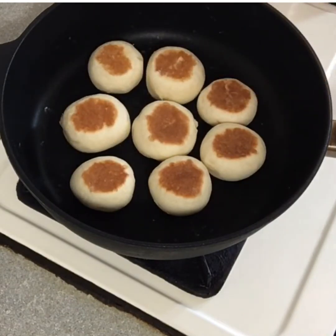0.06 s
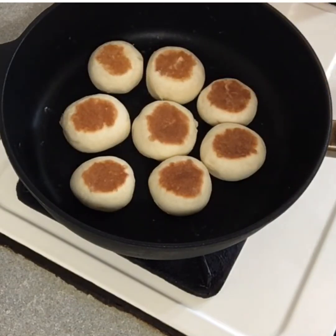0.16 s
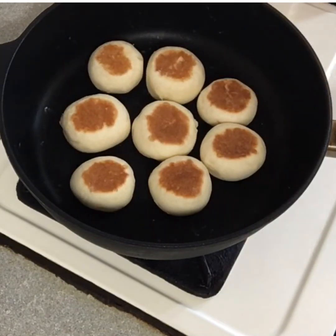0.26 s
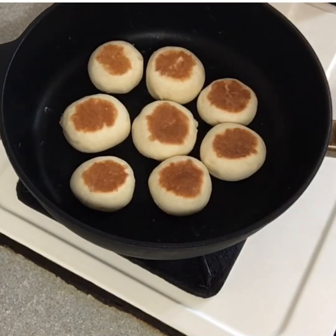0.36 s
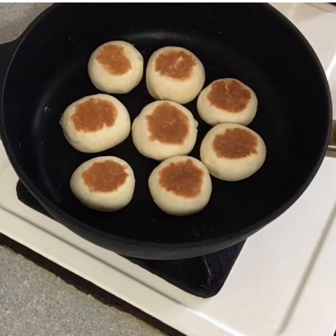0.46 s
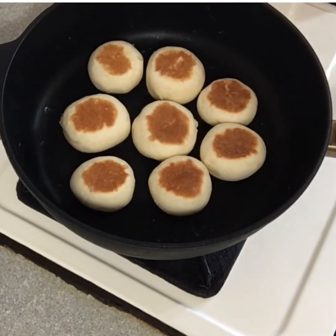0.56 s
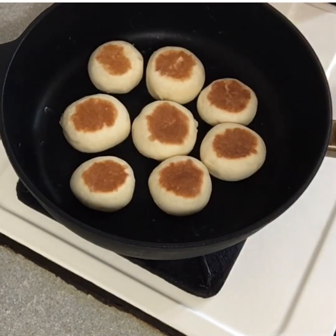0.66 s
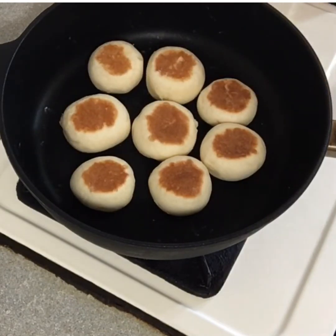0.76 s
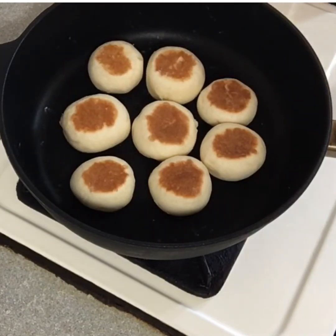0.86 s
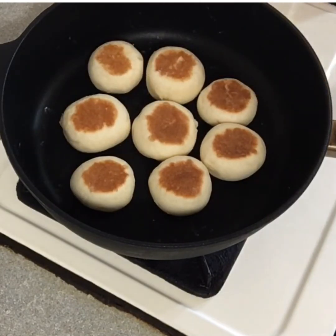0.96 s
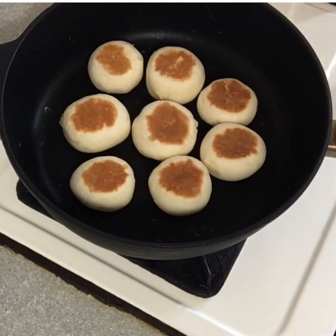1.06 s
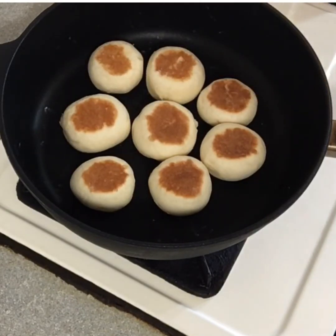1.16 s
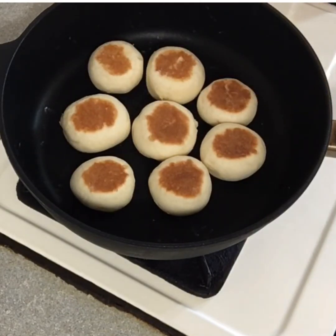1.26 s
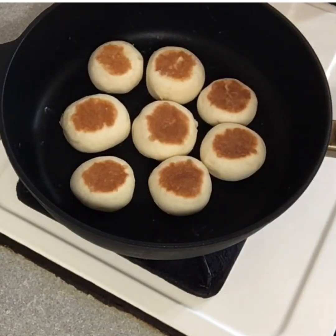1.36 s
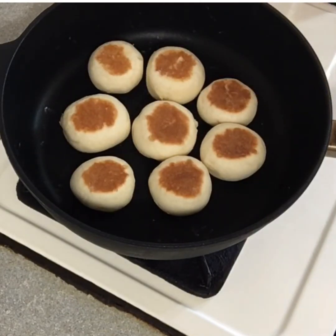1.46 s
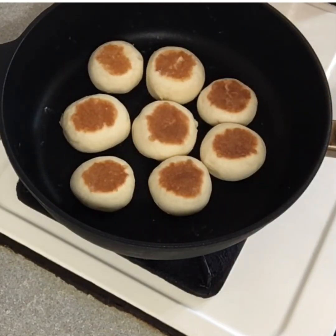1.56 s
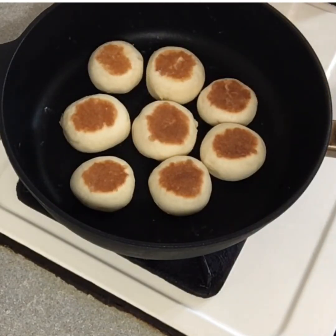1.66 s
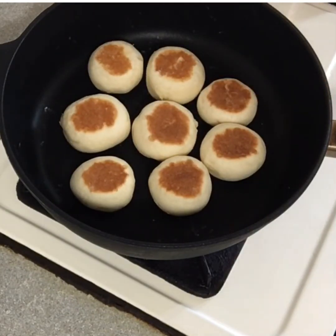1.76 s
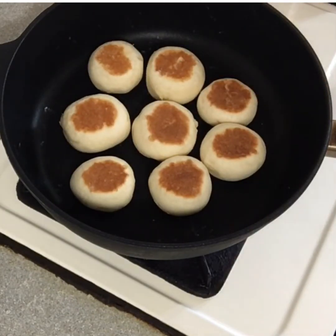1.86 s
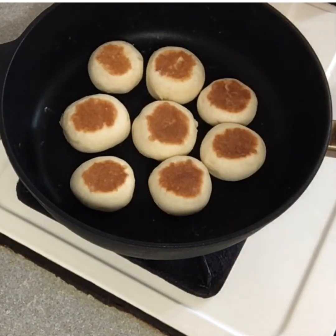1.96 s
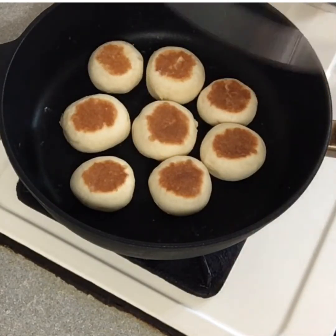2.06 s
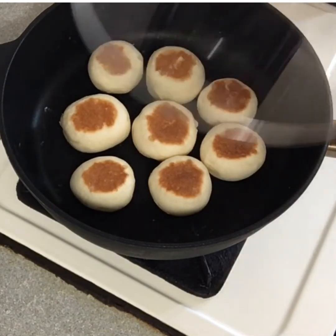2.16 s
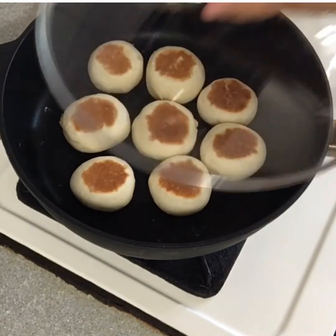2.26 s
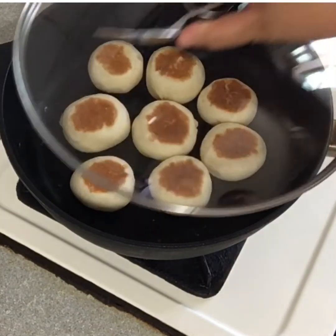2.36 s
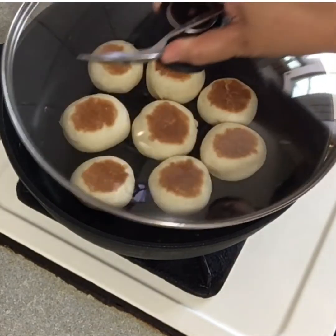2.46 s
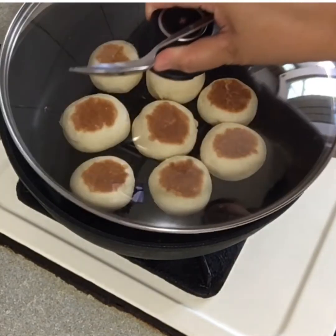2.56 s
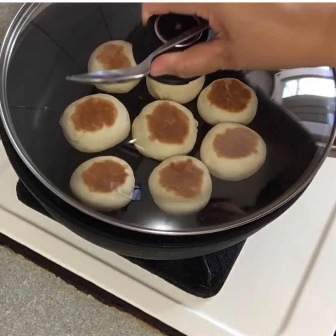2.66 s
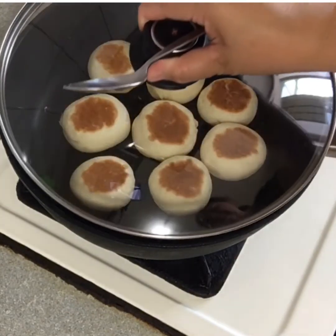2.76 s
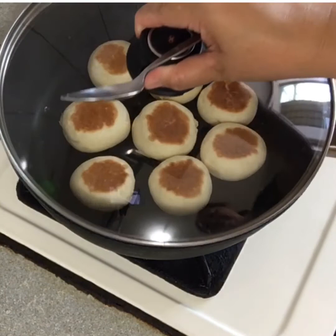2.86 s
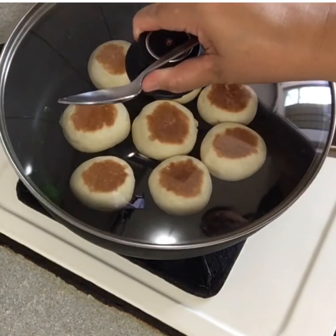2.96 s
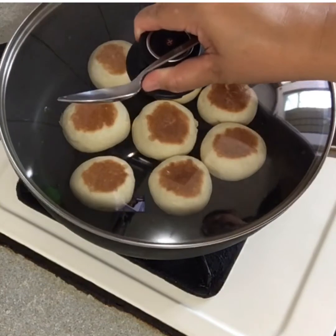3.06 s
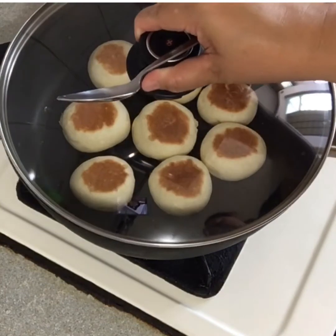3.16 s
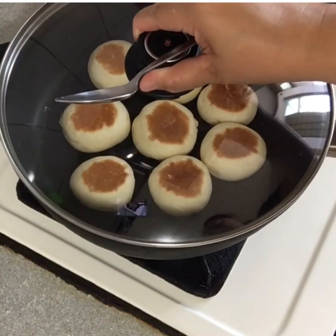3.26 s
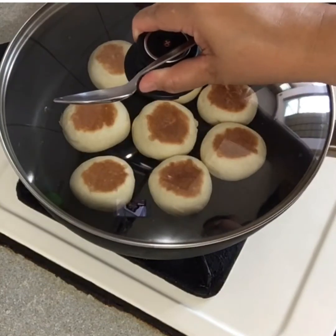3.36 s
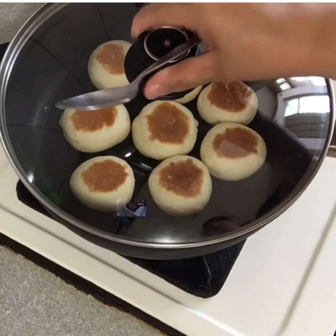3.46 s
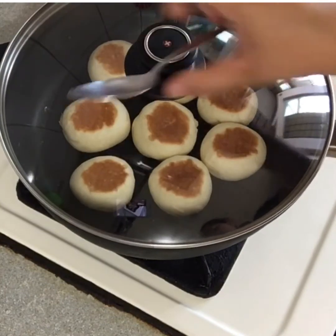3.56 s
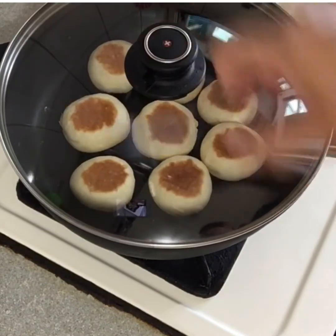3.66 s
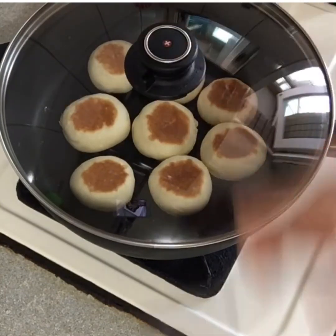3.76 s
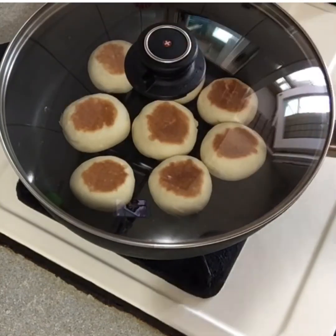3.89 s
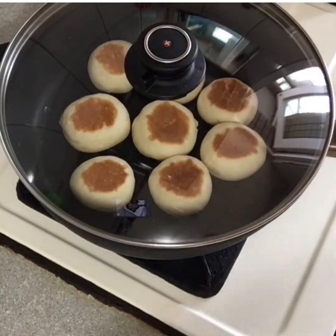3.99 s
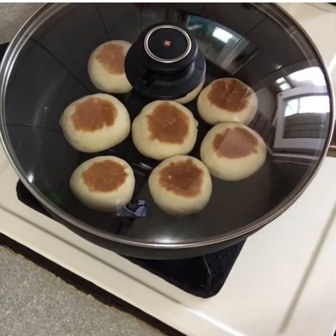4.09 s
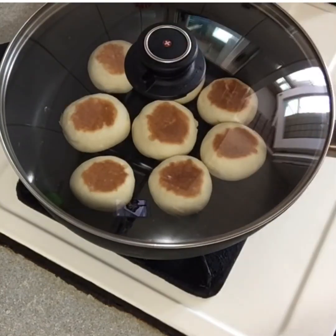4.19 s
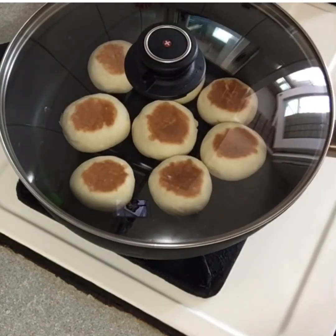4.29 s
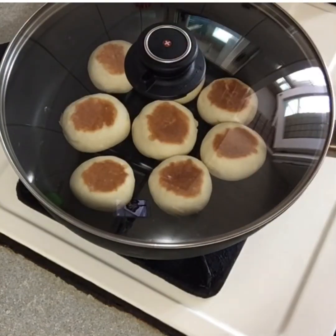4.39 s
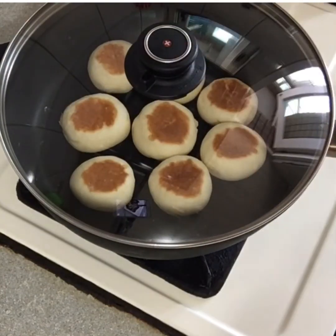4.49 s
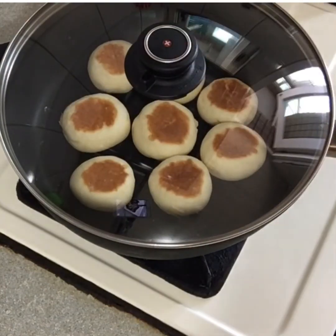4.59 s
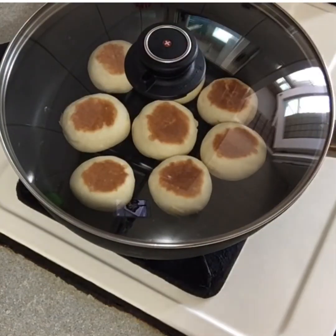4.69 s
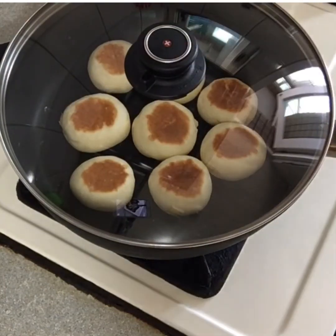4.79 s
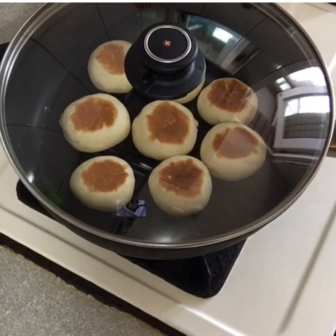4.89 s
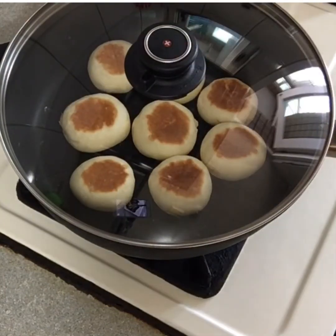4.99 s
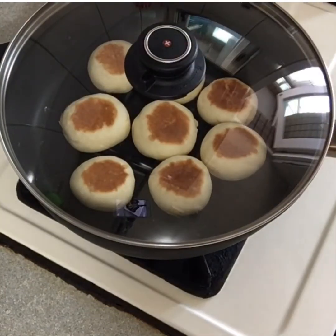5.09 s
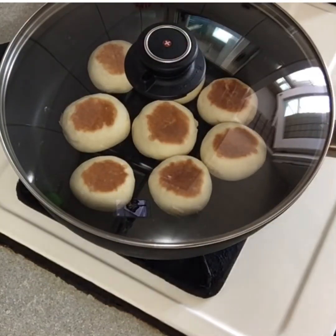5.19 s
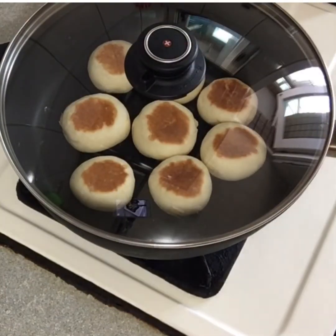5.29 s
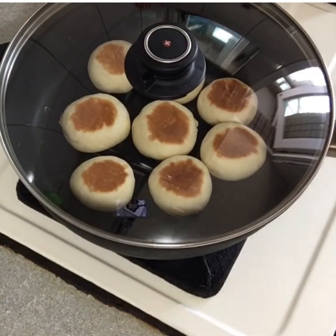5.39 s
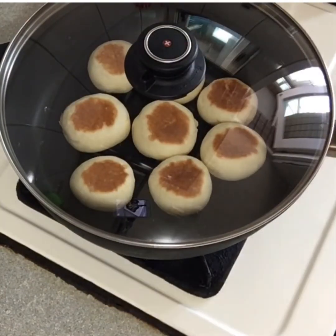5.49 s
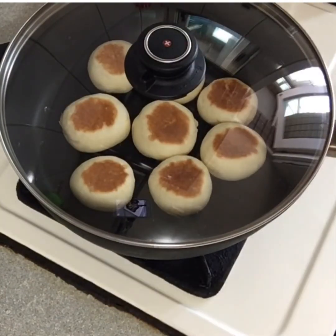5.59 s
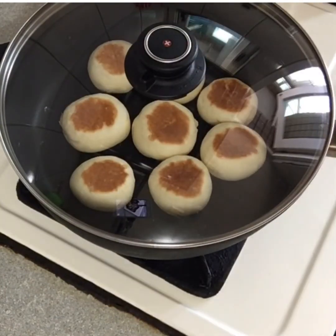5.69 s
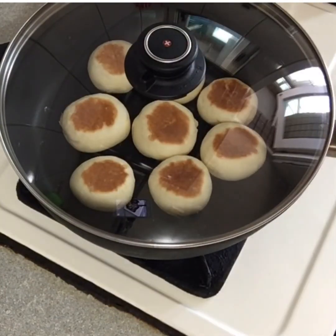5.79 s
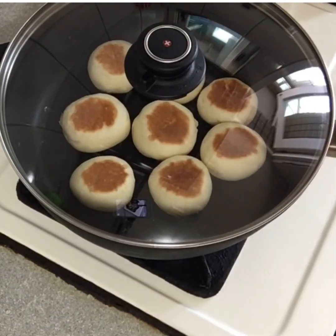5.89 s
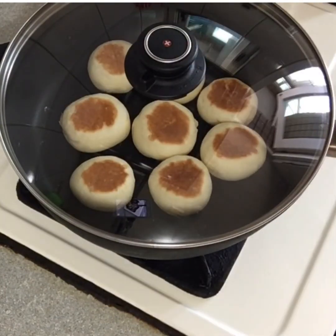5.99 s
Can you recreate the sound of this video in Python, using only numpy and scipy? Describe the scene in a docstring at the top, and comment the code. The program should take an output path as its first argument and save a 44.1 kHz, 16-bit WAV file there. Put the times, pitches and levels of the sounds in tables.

```python
"""Clothes rustle over a low steady hum in a small kitchen, and a utensil clacks on the worktop.
A glass lid is dragged free, rings, and is lowered onto a frying pan: its steel rim knocks, the pan
thuds on the grate, a spoon in the same hand clinks, and the lid rocks to rest. Last, the spoon drops
on the counter and chatters. Each impact excites the damped normal modes of the object struck;
friction in the cloth and at the rim gives noise that swells and fades."""
import sys
import numpy as np
from scipy import signal
from scipy.fft import rfft, irfft, next_fast_len
from scipy.io import wavfile
from scipy.ndimage import uniform_filter1d

SR = 44100
rng = np.random.default_rng(int(sys.argv[2]) if len(sys.argv) > 2 else 0)


def persist_wave(psi):
    """Save psi, clipped to +-1, as 16-bit WAV."""
    counts = np.round(np.clip(psi, -1, 1) * 32767).astype(np.int16)
    wavfile.write(sys.argv[1], SR, np.atleast_2d(counts).T)


N = 266283
TIME = np.arange(N) / SR
AGE = TIME[:32768]   # seconds since an event began

# Spectra of continuous noise: frequency_hz, density_db
ROOM_SPECTRUM = [(13, -68.5), (22, -29.5), (39, -10), (64, -1.5), (95, -12), (147, -11), (174, -21),
                 (294, -20), (328, -21.5), (356, -24), (636, -27.5), (837, -25), (1040, -27), (4630, -41),
                 (16000, -60)]
CLOTH_SPECTRUM = [(290, -48), (500, -17), (781, -4), (1060, -57), (1150, -1), (2500, -1), (2720, -5),
                  (4440, -3.5), (10700, -18.5), (15500, -20)]
# Lines of an appliance's hum: pitch_hz, level_db
HUM_LINES = [(59.2, -67.5), (360.7, -77), (597.5, -81), (4620, -90.5)]
# Movements of the cook's clothes: middle_s, level_db, length_s
RUSTLES = [(0.09, -82, 0.18), (0.33, -68, 0.17), (0.587, -73, 0.089), (1.34, -65, 0.14),
           (1.673, -67, 0.066), (3.899, -67, .12), (4.071, -61.5, .09), (4.574, -70.5, 0.14),
           (4.705, -66, 0.054), (4.838, -63.5, .1), (4.982, -67, 0.085), (5.12, -70, 0.055),
           (5.72, -67.5, 0.079), (6.012, -61.5, 0.14)]
# Slippers scuffing the floor: start_s, level_db, pitch_hz, rise_s
SCUFFS = [(1.641, -56, 950, 0.019), (1.642, -61, 1940, 0.014), (4.051, -53, 2150, 0.015),
          (5.695, -72, 1700, 0.026), (6.023, -57.5, 2600, 0.019)]
# Lid resonances driven by the dragging rim: pitch_hz, width_hz, level_db
DRAG_RESONANCES = [(1140, 18, -4), (1238, 18, 1), (1790, 45, -3), (2330, 90, -5), (3200, 700, -7),
                   (4490, 220, -4), (6700, 1200, -11)]

# Impacts, brighter as the cutoff rises: start_s, level_db, cutoff_hz
UTENSIL_CLACKS = [(0.9845, -33, 2000), (0.9882, -28.5, 11000), (0.9962, -35.5, 4400)]   # a utensil on the worktop
SPOON_TICKS = [(0.600, -59, 3000), (1.148, -63, 10000), (2.392, -76, 9000), (2.5435, -56, 12000),
               (2.754, -64, 4000), (4.8815, -57, 9000), (4.965, -60, 9000), (5.152, -65, 12000),
               (5.803, -64.5, 9000)]   # the spoon in the hand
SPOON_CLINKS = [(3.5150, -30.5, 10000), (3.5185, -42, 4500), (3.5690, -37, 2750)]   # the spoon against the lid
COUNTER_KNOCKS = [(4.8828, -32, 3500), (4.8875, -50, 1500), (5.2025, -38.5, 4000), (5.2095, -32, 3000)]   # dull blows on the counter
SPOON_BOUNCES = [(5.2012, -27, 16000), (5.2075, -43, 12400), (5.2135, -33, 11900), (5.231, -45.5, 9000)]   # the spoon lands
SPOON_FIRST_ROCK = [(5.263, -45.5, 6200)]   # it starts to rock on its bowl
LID_BUMPS = [(1.170, -44.5, 3130), (1.192, -47, 1380), (1.352, -50, 1580), (1.376, -61, 590),
             (1.426, -57.5, 5760), (1.462, -53.5, 500)]   # the lid against its resting place as it is picked up
RIM_KNOCKS = [(2.9335, -40.5, 1170), (2.9732, -44.5, 3500), (3.002, -45.5, 1280), (3.045, -49.5, 1600),
              (3.1024, -54, 1500), (3.2276, -40, 1120), (3.2505, -41, 4100), (3.290, -47.5, 2980),
              (3.3485, -37, 4360), (3.391, -48.5, 1900), (3.5684, -47, 2540), (3.7815, -44.5, 1800)]   # the rim is nudged into its seat on the pan
PAN_THUDS = [(2.749, -48.5, 910), (2.776, -54, 595), (2.828, -56.5, 397), (2.934, -41.5, 890),
             (2.960, -42, 604), (2.988, -41.5, 346), (2.998, -38.5, 200), (3.045, -47.5, 407),
             (3.193, -40, 156), (3.204, -47, 910), (3.240, -43, 300), (3.325, -36, 155), (3.352, -43, 193)]   # the pan on the burner grate
LID_FIRST_ROCK = [(3.9797, -48, 1990)]   # the released lid starts to rock

# Distinct normal modes of each object: pitch_hz, level_db, t60_s
CLACK_MODES = [(1440, -4, .05), (1585, 1, .06), (2000, -9, .06), (2625, -8, .1), (2719, -9, .16),
               (3005, -6, .14), (3115, -4, .08), (3510, -4, .09), (3634, 0, .09), (3760, 2, .08),
               (3920, -2, .1), (5572, -10, .2), (6401, -8, .04)]
CLINK_MODES = [(1267, -4, 0.1), (1768, -5, 0.04), (2702, -2, 0.026), (2840, -19, 0.054), (3230, 5, 0.056),
               (3970, -16, 0.093), (4250, -11, 0.091), (5090, -19, 0.048), (5560, -2, 0.038),
               (6400, -18.5, 0.15), (7050, -15, 0.08)]
COUNTER_MODES = [(96, -7, 0.24), (200.4, 0, 0.2), (275, 4.5, 0.069), (425, -11, 0.098), (518, -8.5, 0.089),
                 (644, -6.5, 0.13), (1090, -14, 0.18), (1302, -11, 0.25)]
SPOON_MODES = [(1541, -15, .38), (1663, -20, .45), (2025, -10, .3), (2081, -11, .55), (2339, -16, .42),
               (2692, -12, .45), (3293, -1, .11), (3415, 0.5, .14), (3498, -18, .42), (3757, -11, .16),
               (4145, -16, .22), (4203, -5, .17), (4527, -13, .22), (4608, -22, .5), (5063, -11, .34),
               (5140, -9, .28), (5445, -8, .19), (5838, -14, .22), (5881, -9, .21), (6640, -11, .23),
               (7098, -8, .22), (7413, -14, .23), (8105, -9, .16), (8192, -8, .12), (10078, -22, .28),
               (10650, -19, .18), (10703, -20, .2), (11538, -12, .17), (13033, -16, .14), (13861, -21, .17)]
FREE_LID_MODES = [(770, -9, .25), (1135, -5, .8), (1238, 0, .7), (1766, -9, .6), (2330, -14, .4),
                  (2988, -16, .3), (4436, -18, .25)]
SEATED_LID_MODES = [(851, 4, 0.074), (1190, -2.5, 0.11), (1292, -4, 0.083), (1359, 5, 0.093),
                    (1670, -5.5, .14), (1754, -6.5, 0.15), (1975, -8.5, 0.16), (2200, -11, 0.13),
                    (2570, 0, 0.076), (3090, -4.5, 0.087), (3480, -3.5, 0.054), (3900, -19, 0.37),
                    (4190, -11, 0.067), (4470, -12, 0.14), (5600, -13, .11), (6180, -12, 0.11)]
PAN_MODES = [(89, -1, .25), (108, -3, .12), (137, 2, .35), (212, -6, .2), (310, -2, .14), (350, -6, .16)]

# Spectra of the dense, short-lived modes beneath them: frequency_hz, density_db
CLACK_BODY = [(200, -25), (650, -24), (1050, -27), (1500, -2), (1800, -15), (2100, -12), (3000, -7.5),
              (3700, 1.5), (4200, -17.5), (5600, -12), (6400, -11.5), (7800, -29.5), (8700, -23),
              (15000, -54)]
TICK_BODY = [(500, -34.5), (2000, 1.5), (4000, -15.5), (5500, 5), (7500, -3.5), (9500, -10.5),
             (13000, -7.5), (16000, -10)]
CLINK_BODY = [(120, -55), (200, -21), (923, -22.5), (1450, -15), (1780, -8), (2380, -24), (2700, 2.5),
              (2960, -15), (3240, -8.5), (4750, -19), (5700, -14), (7760, -32.5), (15500, -39)]
COUNTER_BODY = [(50, -17), (110, -9.5), (260, -3), (600, -7), (1300, -7), (2500, -13.5), (3500, -21.5),
                (8000, -16.5), (15000, -32.5)]
SPOON_BODY = [(200, -6.5), (900, -11), (2000, -2), (3600, -1.5), (5500, 1.5), (7300, -1.5), (8500, -7),
              (12000, -9), (15500, -10)]
FREE_LID_BODY = [(47, -47), (80, -3), (753, -11.5), (1130, -16.5), (1220, -21), (1410, -13), (2430, -19),
                 (2800, -23), (4280, -22.5), (10000, -36), (13000, -75), (22000, -120)]
SEATED_LID_BODY = [(150, 0.5), (400, -5), (850, 0.5), (1030, -5), (1400, 2.5), (2000, -2), (3200, -11.5),
                   (5000, -17.5), (7000, -17), (14000, -26)]
PAN_BODY = [(45, -27), (90, 1.5), (180, -13), (330, 2), (550, -15.5), (1500, -18)]


def from_db(db):
    """Amplitude grows tenfold for every 20 dB."""
    return 10 ** (np.asarray(db) / 20)


def unit_power(x):
    """Division by the RMS amplitude gives unit power."""
    return x / np.sqrt(np.mean(x ** 2) + 1e-20)


def add(out, start_s, sound):
    """Superposition: a sound adds to those already present."""
    start = int(start_s * SR)
    out[start:start + len(sound)] += sound[:N - start]


def decay(t60_s):
    """Damping lowers a free vibration exponentially, by 60 dB in t60_s."""
    return np.exp(-np.log(1000) * AGE / t60_s)


def flicker(window_samples):
    """A moving average of white noise leaves a slower fluctuation, of unit power."""
    return unit_power(uniform_filter1d(rng.standard_normal(N), size=window_samples))


def coloured_noise(spectrum, size):
    """Spectral weighting colours white noise; the result has unit power."""
    hz, db = np.transpose(spectrum)
    padded = next_fast_len(size)
    log_hz = np.log(np.fft.rfftfreq(padded, 1 / SR) + 1)
    bass_rolloff = np.exp(2 * np.minimum(log_hz - np.log(hz[0]), 0))
    gain = from_db(np.interp(log_hz, np.log(hz), db)) * bass_rolloff
    white = rfft(rng.standard_normal(padded))
    return unit_power(irfft(white * gain, padded)[:size])


def resonant_noise(hz, width_hz, size):
    """Resonance, applied twice, selects a band of noise; the result has unit power."""
    b, a = signal.iirpeak(hz, hz / width_hz, fs=SR)
    once = signal.lfilter(b, a, rng.standard_normal(size + SR))
    return unit_power(signal.lfilter(b, a, once)[SR:])   # the steady state, after one second


def dense_modes(spectrum, t60_s, damping):
    """Overlapping modes merge into decaying noise; t60_s holds at 1 kHz and shortens in the treble."""
    centres_hz = np.geomspace(125, 16000, 6)
    log_hz = np.log(np.fft.rfftfreq(len(AGE), 1 / SR) + 1)
    shares = np.array([np.interp(log_hz, np.log(centres_hz), row) for row in np.eye(len(centres_hz))])
    bands = irfft(rfft(coloured_noise(spectrum, len(AGE))) * shares)
    band_t60_s = t60_s * (centres_hz / 1000) ** -damping
    return np.sum(bands * decay(band_t60_s[:, None]), axis=0)


def struck(impacts, modes, body, ring_db, body_db, t60_s, damping):
    """Modal excitation: each impact lands on another spot and shares its force differently among modes."""
    out = np.zeros(N)
    rings = np.array([from_db(db) * np.sin(2 * np.pi * hz * AGE) * decay(life_s)
                      for hz, db, life_s in modes])
    signs = (-1) ** np.arange(len(modes))   # neighbouring modes start in opposite directions
    attack = 1 - np.exp(-AGE / 0.0006)   # slightly softened, building up over about a millisecond
    for start_s, level_db, cutoff_hz in impacts:
        strengths = signs * from_db(ring_db + rng.standard_normal(len(modes)))
        dense = from_db(body_db) * dense_modes(body, t60_s, damping)
        vibration = attack * (strengths @ rings + dense)
        contact = signal.butter(2, cutoff_hz, fs=SR)   # a longer contact excites less treble
        add(out, start_s, from_db(level_db) * signal.lfilter(*contact, vibration))
    return out


def rocking(first, gap_s, gap_ratio, loss_db, dulling, count):
    """Rocking loses energy at each impact: gap, amplitude and cutoff follow geometric progressions."""
    (start_s, level_db, cutoff_hz), = first
    return [(start_s + gap_s * np.sum(gap_ratio ** np.arange(k)),
             level_db - loss_db * k,
             cutoff_hz * dulling ** k) for k in range(count)]


def kitchen(direct, wet_db, t60_s):
    """Reverberation: hard walls and tiles add a short diffuse tail to the direct sound."""
    tail = dense_modes([(80, 1), (1000, -2), (5000, -1.5), (15000, 0.5)], t60_s, damping=0.086)
    tail *= 1 - np.exp(-(AGE / 0.011) ** 2)   # reflections take a moment to build up
    return direct + from_db(wet_db) * signal.fftconvolve(direct, tail / np.linalg.norm(tail))[:N]


def background():
    """Stationary noise: broad room rumble and hiss, with narrow bands heard as a wavering hum."""
    hum = sum(from_db(db) * resonant_noise(hz, 4 + 0.016 * hz, N) for hz, db in HUM_LINES)
    return from_db(-62) * coloured_noise(ROOM_SPECTRUM, N) + hum


def clothes():
    """Sliding friction in cloth makes grainy noise whose amplitude follows the speed of movement."""
    speed = sum(from_db(db) * np.exp(-2 * ((TIME - middle_s) / length_s) ** 2)
                for middle_s, db, length_s in RUSTLES)
    grain_db = 1.9 * flicker(window_samples=200)
    return speed * from_db(grain_db) * coloured_noise(CLOTH_SPECTRUM, N)


def slippers():
    """Friction between sole and floor gives a broad band of noise that swells and fades."""
    out = np.zeros(N)
    for start_s, db, hz, rise_s in SCUFFS:
        swell = AGE / rise_s * np.exp(1 - AGE / rise_s)
        add(out, start_s, from_db(db) * swell * resonant_noise(hz, 0.67 * hz, len(AGE)))
    return out


def held_utensils():
    """Damping by the fingers keeps the ring of hand-held steel short."""
    clack = struck(UTENSIL_CLACKS, CLACK_MODES, CLACK_BODY,
                   ring_db=-9.5, body_db=3, t60_s=0.063, damping=0.18)
    clink = struck(SPOON_CLINKS, CLINK_MODES, CLINK_BODY,
                   ring_db=-2, body_db=2, t60_s=0.06, damping=0.11)
    tick = struck(SPOON_TICKS, SPOON_MODES, TICK_BODY, ring_db=-29, body_db=3.5, t60_s=0.1, damping=0.17)
    return kitchen(clack + tick, wet_db=-10, t60_s=0.38) + kitchen(clink, wet_db=-12.5, t60_s=0.33)


def shimmer_modes(level_db, t60_s, count):
    """A spoon's weak bending and twisting modes lie close enough to beat; t60_s holds at 4 kHz."""
    hz = np.geomspace(2300, 15000, count) * rng.uniform(0.985, 1.015, count)
    body_hz, colour_db = np.transpose(SPOON_BODY)
    db = level_db + np.interp(hz, body_hz, colour_db) + 3 * rng.standard_normal(count)
    return list(zip(hz, db, t60_s * (4000 / hz) ** 0.14))


def spoon_on_counter():
    """Free vibration: the dropped spoon rings, then rocks; the counter's low modes give a hollow knock."""
    settling = rocking(SPOON_FIRST_ROCK, gap_s=0.0285, gap_ratio=1.038, loss_db=2, dulling=0.92, count=9)
    free_modes = SPOON_MODES + shimmer_modes(level_db=-15, t60_s=0.2, count=110)
    landing = struck(SPOON_BOUNCES, free_modes, SPOON_BODY,
                     ring_db=-2.5, body_db=-1, t60_s=0.17, damping=0.1)
    chatter = struck(settling, SPOON_MODES, SPOON_BODY, ring_db=-3.5, body_db=7, t60_s=0.15, damping=0.1)
    knock = struck(COUNTER_KNOCKS, COUNTER_MODES, COUNTER_BODY,
                   ring_db=-5.5, body_db=-0.5, t60_s=0.11, damping=0.21)
    return kitchen(landing + chatter, wet_db=-15, t60_s=0.64) + kitchen(knock, wet_db=-13, t60_s=0.72)


def rim_drag():
    """Stick-slip friction drives the lid's resonances ever harder until the steel rim comes free."""
    start_s, end_s, attack_s, release_s = 1.15, 1.432, 0.037, 0.0099
    end_db, swell_db_per_s = -58.5, 29
    attack = np.clip((TIME - start_s) / attack_s, 0, 1)
    release = np.exp(-np.maximum(TIME - end_s, 0) / release_s)
    pull_db = end_db - swell_db_per_s * np.maximum(end_s - TIME, 0)
    slips_db = 2 * flicker(window_samples=260)
    ringing = sum(from_db(db) * resonant_noise(hz, width_hz, N) for hz, width_hz, db in DRAG_RESONANCES)
    return attack * release * from_db(pull_db + slips_db) * unit_power(ringing)


def lid_and_pan():
    """Contact damping: the lid rings long in the air but briefly on the pan, which thuds on the grate."""
    settling = rocking(LID_FIRST_ROCK, gap_s=0.131, gap_ratio=0.757, loss_db=4.5, dulling=0.88, count=5)
    lift = struck(LID_BUMPS, FREE_LID_MODES, FREE_LID_BODY,
                  ring_db=-6.5, body_db=4, t60_s=0.24, damping=0.034)
    rim = struck(RIM_KNOCKS + settling, SEATED_LID_MODES, SEATED_LID_BODY,
                 ring_db=-7, body_db=-0.5, t60_s=0.11, damping=0.15)
    thud = struck(PAN_THUDS, PAN_MODES, PAN_BODY, ring_db=-4, body_db=3.5, t60_s=0.18, damping=0.22)
    return (kitchen(lift + rim_drag() + thud, wet_db=-9.5, t60_s=0.56)
            + kitchen(rim, wet_db=-9.5, t60_s=0.35))


def scene():
    """The pressures of all sources superpose at one point just above the stove."""
    pressure = lid_and_pan() + held_utensils() + spoon_on_counter() + clothes() + slippers() + background()
    return pressure[None, :]


def record(dry):
    """Band limiting: the small microphone loses the deepest bass, and the top is cut steeply."""
    highpass = signal.butter(4, 36, "high", fs=SR, output="sos")
    lowpass = signal.ellip(10, 0.1, 80, 15800, fs=SR, output="sos")
    return signal.sosfilt(lowpass, signal.sosfilt(highpass, dry))


dry = scene()
out = record(dry)
persist_wave(out)
```